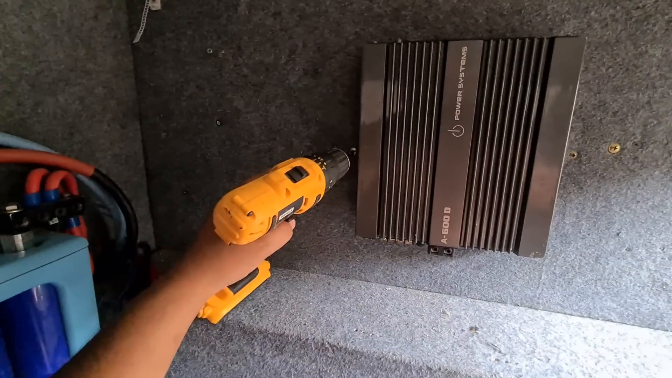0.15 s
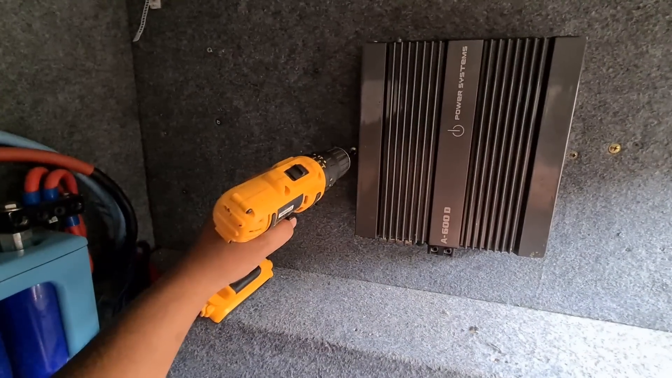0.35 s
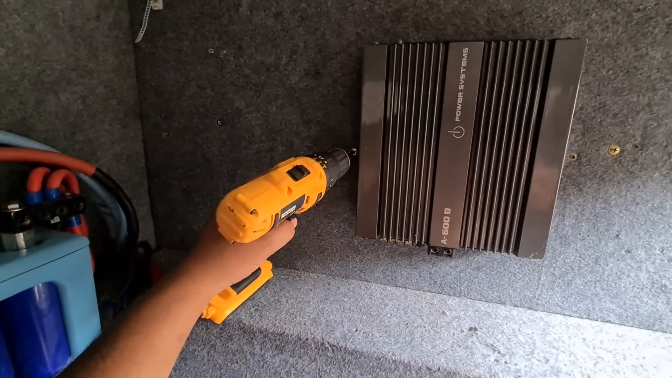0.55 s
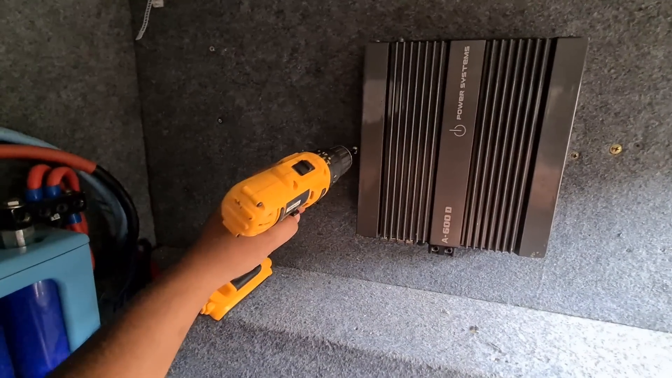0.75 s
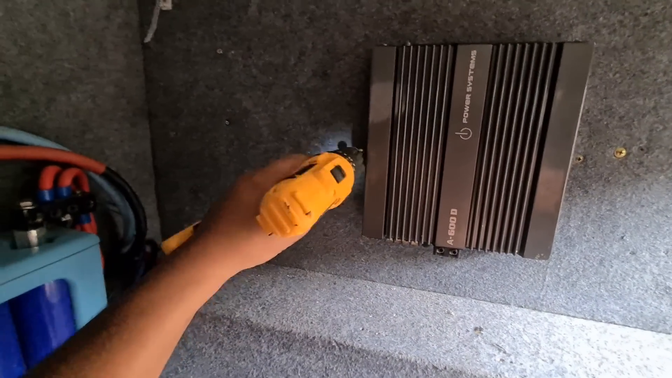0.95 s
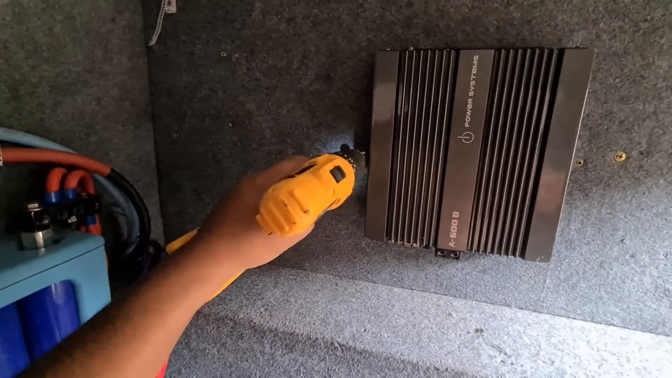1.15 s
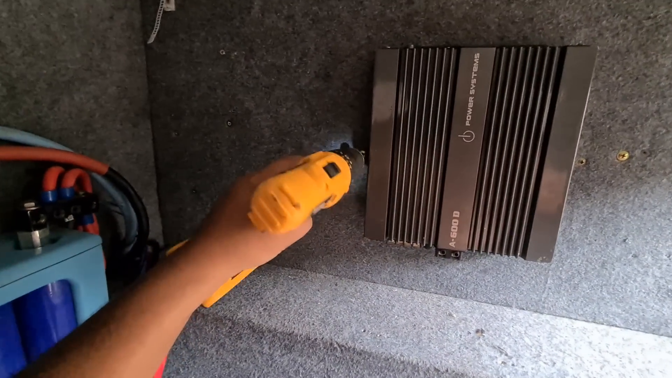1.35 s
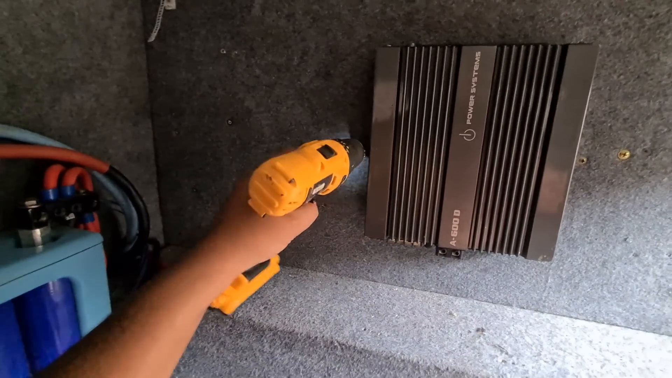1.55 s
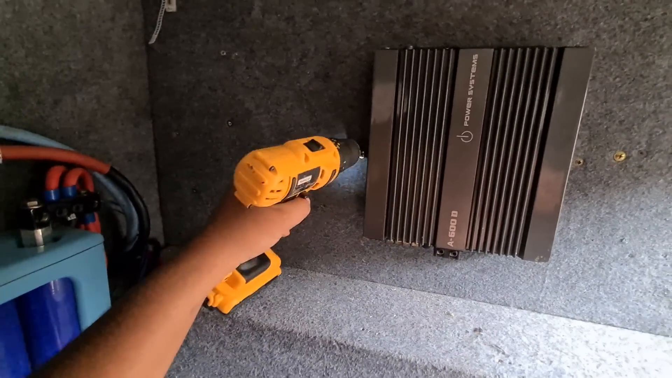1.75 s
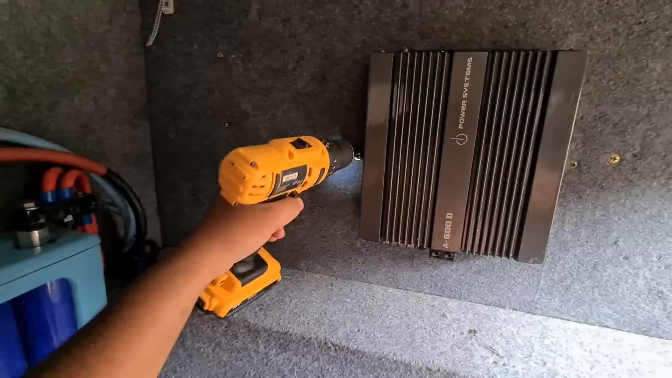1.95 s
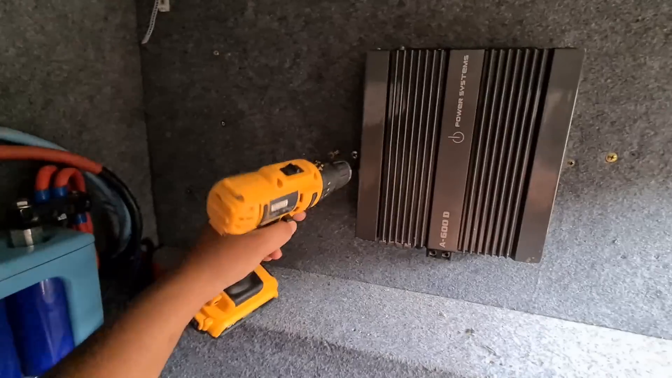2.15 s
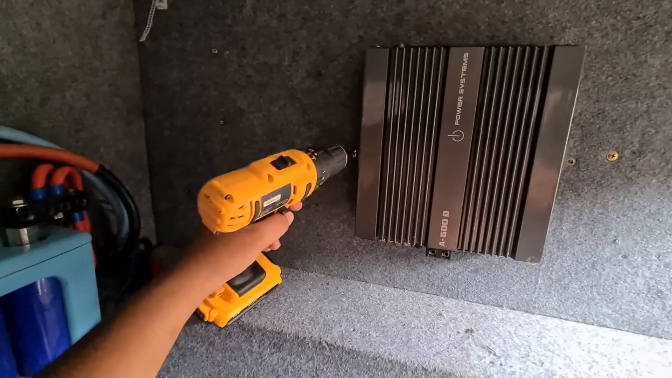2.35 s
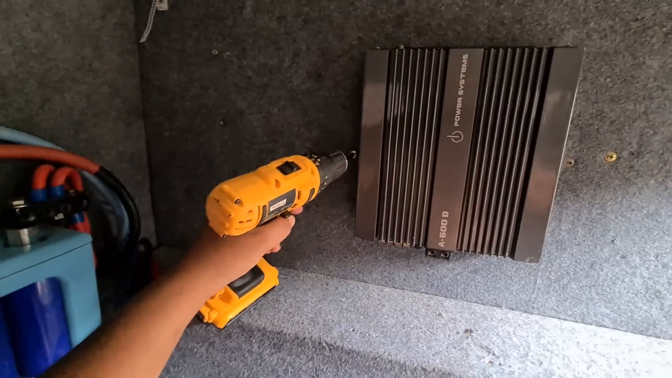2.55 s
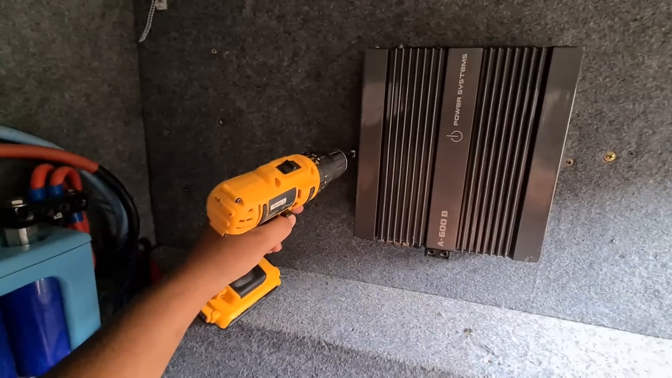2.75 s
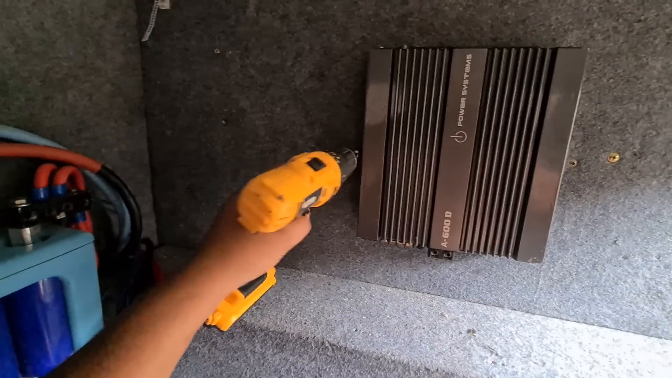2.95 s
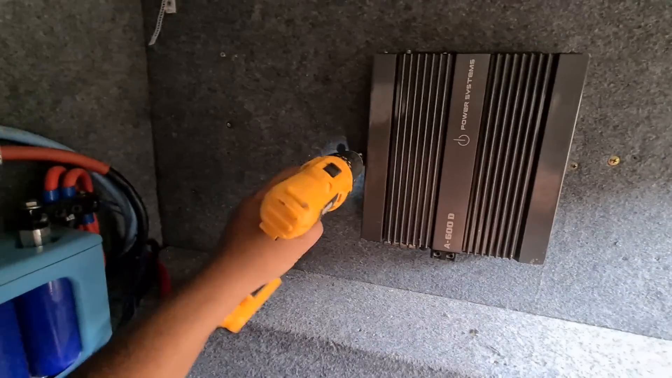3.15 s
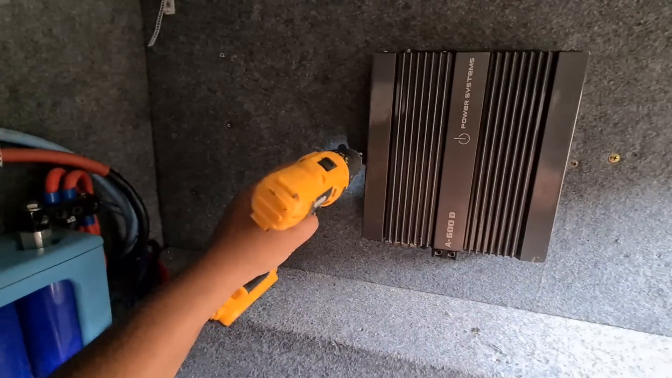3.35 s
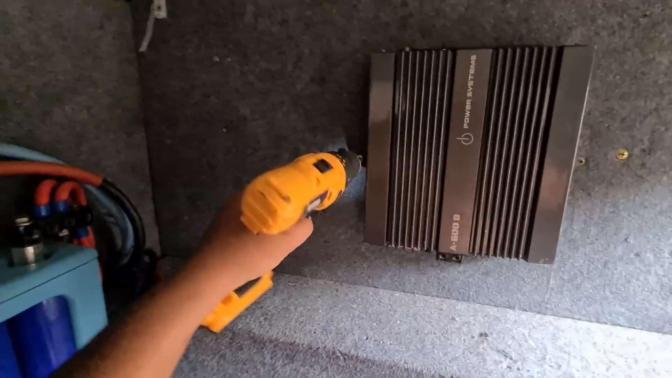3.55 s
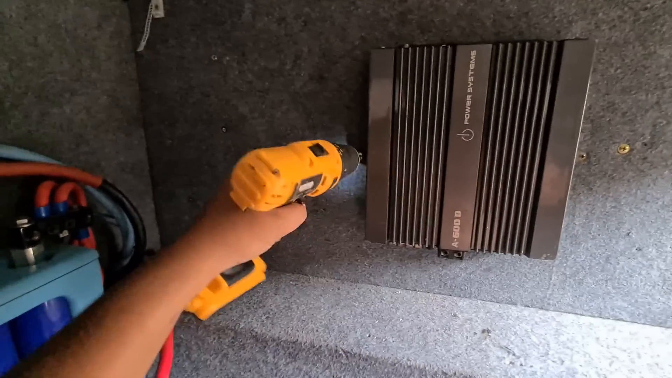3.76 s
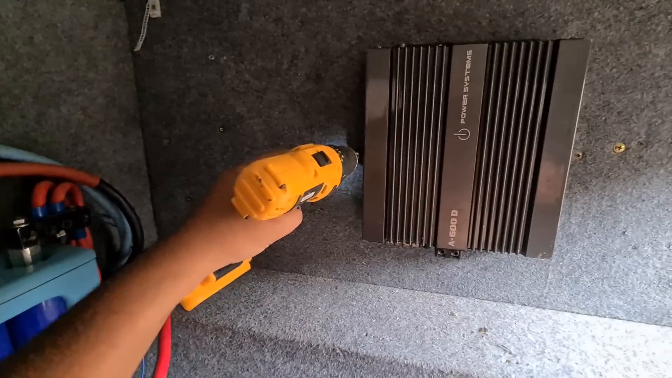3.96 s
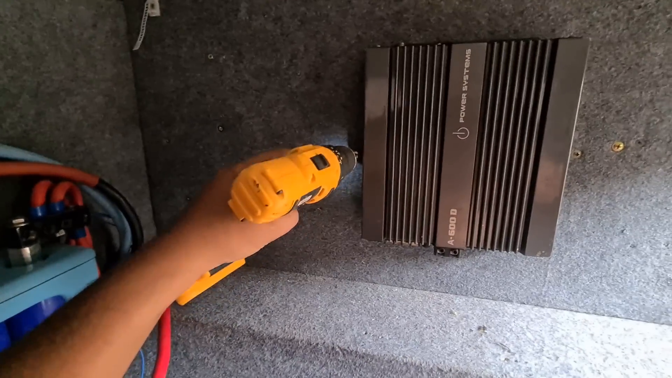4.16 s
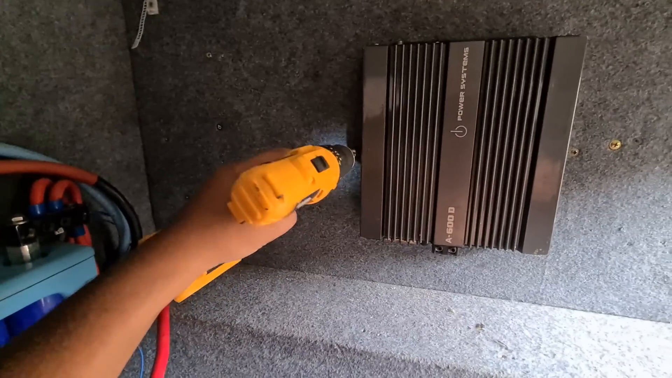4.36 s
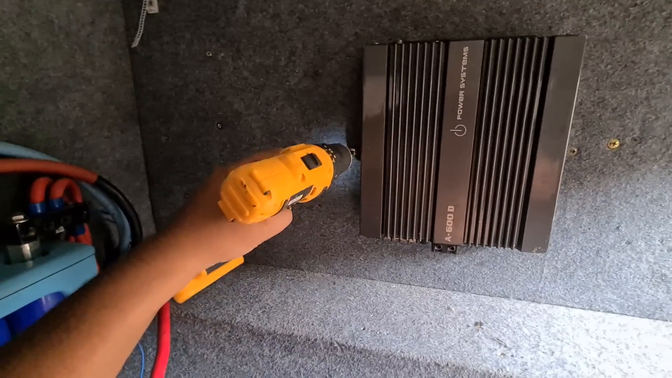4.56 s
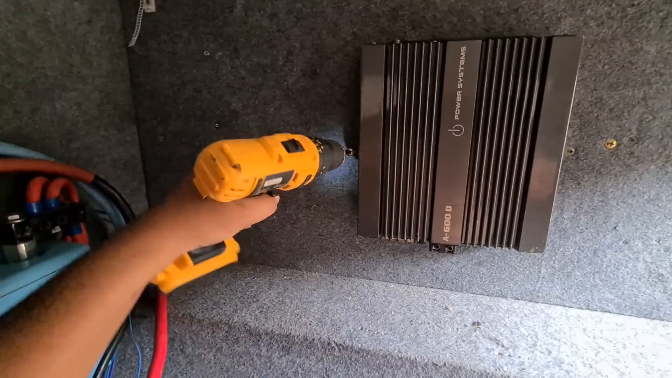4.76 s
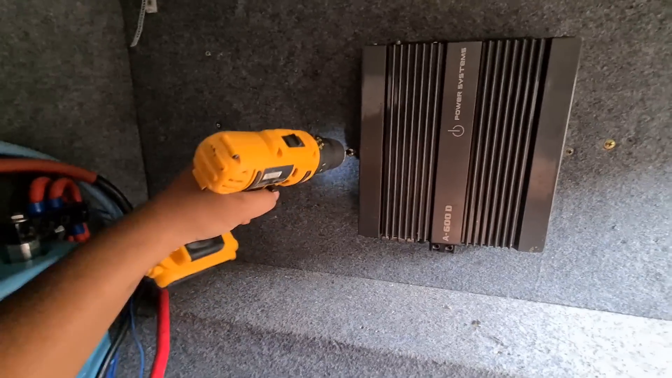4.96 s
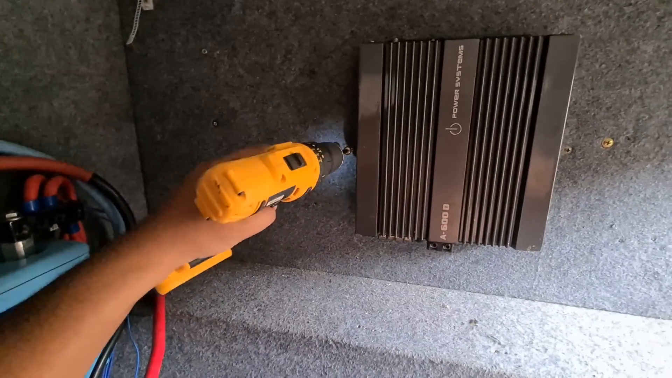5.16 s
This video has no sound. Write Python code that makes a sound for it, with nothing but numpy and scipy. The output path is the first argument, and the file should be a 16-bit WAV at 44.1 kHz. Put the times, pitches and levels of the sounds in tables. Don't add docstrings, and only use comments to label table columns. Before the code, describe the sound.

Two bursts of gritty electric drill whine, knocks and bit slips against a padded board in a car trunk, over faint distant rumble.

```python
import sys
import numpy as np
from scipy import signal
from scipy.fft import rfft, irfft
from scipy.io import wavfile
from scipy.ndimage import uniform_filter1d

SR = 44100
rng = np.random.default_rng(int(sys.argv[2]) if len(sys.argv) > 2 else 0)


def wrap_up_sound(samples):
    columns = np.atleast_2d(samples).T
    tamed = np.clip(columns, -1, 1)
    steps = np.round(tamed * 32767).astype(np.int16)
    wavfile.write(sys.argv[1], SR, steps)


def voltage_ratio(decibels):
    exponent = np.asarray(decibels, float) / 20
    return 10 ** exponent


N = 230307
TIME = np.arange(N) / SR
BINS = np.maximum(np.fft.rfftfreq(N, 1 / SR), 1)


def rms_one(x):
    return x / np.sqrt(np.mean(x ** 2) + 1e-20)


def at_hz(points, hz):
    table_hz, values = np.array(points).T
    return np.interp(np.log(hz), np.log(table_hz), values)


def played(rows, fade_s=.006):
    s, *columns = np.transpose(rows)
    gate = np.clip(np.minimum(TIME - s[0], s[-1] + fade_s - TIME) / fade_s, 0, 1)
    return [gate] + [np.interp(TIME, s, c) for c in columns]


def drift(rate):
    knots = rng.standard_normal(int(N / SR * 400) + 2)
    return np.interp(TIME * min(rate, 390), np.arange(len(knots)), knots)


def noise(spectrum):
    inside = (BINS > spectrum[0][0] * .7) & (BINS < spectrum[-1][0] * 1.1)
    white = rfft(rng.standard_normal((2, N)))
    return rms_one(irfft(white * voltage_ratio(at_hz(spectrum, BINS)) * inside, N))


def ring(clicks, modes):
    out = 0
    for hz, level_db, t60 in modes:
        r = voltage_ratio(-60 / (t60 * SR))
        w = 2 * np.pi * hz / SR
        strike = [0, voltage_ratio(level_db) * np.sin(w)]
        out = out + signal.lfilter(strike, [1, -2 * r * np.cos(w), r * r], clicks + 1e-18)
    return out


def clicks_at(seconds, sizes):
    return np.bincount(np.clip(np.round(seconds * SR).astype(int), 0, N - 1), sizes, N)


def soft(clicks, hz):
    return signal.sosfilt(signal.butter(2, hz, fs=SR, output="sos"), clicks)


def dying(clicks, t60):
    return signal.lfilter([1], [1, -voltage_ratio(-60 / (t60 * SR))], clicks + 1e-18)


# pitch in Hz, lead in seconds.
LEFT_LEAD = [(1500, .00015), (2500, .00036)]


def lines(rows, orders, per=1, wobble_db=3, colour=((1, 0), (2, 0)), flutter_hz=40):
    gate, hz, level_db = played(rows)
    on = gate > 0
    base_hz = hz[on] / per
    turns = np.cumsum(base_hz) / SR
    out = np.zeros((2, N))
    for k, order_db in orders:
        flutter_db = wobble_db * drift(flutter_hz)[on]
        level = level_db[on] + order_db + at_hz(colour, k * base_hz) + flutter_db
        apart = np.array([[0], [1]]) * (1 / 4 - k * base_hz * LEFT_LEAD[-1][1])
        phase = k * turns + rng.random() + apart + .13 * drift(70)[on]
        out[:, on] += np.sqrt(2) * gate[on] * voltage_ratio(level) * np.sin(2 * np.pi * phase)
    return out


# time in seconds, level in dB.
SWELL = [
    (0, 2),
    (2.2, 3),
    (2.6, 8),
    (5.22, 16.5),
]
# pitch in Hz, level in dB per Hz.
RUMBLE = [(12, -48), (20, 1), (38, -11), (54, -52), (65, -2), (85, -1.5), (103, -7), (124, -17), (206, -28),
          (387, -23.5), (800, -36), (1040, -85), (1760, -120)]
# pitch in Hz, level in dB per Hz.
AIR = [(410, -73), (700, -9), (777, -44), (875, -13.5), (1110, 4.5), (1250, -5.5), (1580, -12.5),
       (1710, -5), (2400, -10.5), (2960, -5), (3300, -12.5), (4200, -17), (5200, -21.5), (6300, -13),
       (7200, -21.5), (8900, -36), (11400, -28), (16000, -38)]


def outdoors():
    _, swell_db = played(SWELL)
    rumble = voltage_ratio(-44.5 + 0.22 * swell_db + 2.8 * drift(3.85)) * noise(RUMBLE)
    return rumble + voltage_ratio(-61.5 + swell_db + drift(15)) * noise(AIR)


# start in seconds, end in seconds, level in dB.
RUSTLE = [
    (2.678, 2.82, -59),
    (3.107, 3.15, -66),
]
# pitch in Hz, level in dB per Hz.
GEARS = [(940, -21.5), (1600, -49), (1890, -2.5), (2300, -6.5), (2920, 3), (3420, -2), (3630, 1),
         (4200, -6.5), (4650, 3), (5080, -1.5), (5670, 4.5), (7350, -7), (8200, -91), (10700, -55),
         (18000, -120)]


def grip_rustle():
    rise, fall = 153, 350
    strokes = 0
    for start, end, level_db in RUSTLE:
        outside_db = rise * np.maximum(start - TIME, 0) + fall * np.maximum(TIME - end, 0)
        strokes = strokes + voltage_ratio(level_db - outside_db)
    return strokes * voltage_ratio(1.4 * drift(35)) * noise(GEARS)


# time in seconds, peak in dB, pitch in Hz, ring in seconds,
# share of pure tone from 0 to 1.
TICKS = [(0.831, -48, 3560, 0.027, 0.9), (0.8462, -35.5, 3060, 0.034, 0.45),
         (0.8654, -24.5, 3120, 0.015, 0.5), (0.8947, -30, 3580, 0.03, 0), (0.835, -49, 1680, 0.11, 1),
         (1.005, -38, 3020, 0.03, 0.4), (2.0565, -10.5, 4555, 0.046, 0), (2.7824, -36, 1910, 0.32, 0.95),
         (2.8133, -45, 2900, 0.012, 0.7), (2.8249, -32.5, 3000, 0.013, 1), (3.016, -42, 3260, 0.056, 0.65),
         (3.0614, -53, 6700, 0.03, 0.15), (3.061, -36, 1140, 0.04, 0.4), (3.161, -31, 3170, 0.055, 0.6),
         (3.108, -43, 3220, 0.022, 0.8), (3.1274, -44, 3000, 0.013, 0.9), (3.172, -22.5, 4200, 0.035, 0.3),
         (3.186, -17.5, 3020, 0.071, 0.35)]
# the same five columns, in seconds, dB, Hz, seconds and share.
FINE_TICKS = [
    (2.638, -52, 13000, .01, 0),
    (2.664, -51, 9500, .012, 0),
    (2.681, -56, 8000, .01, 0),
    (2.735, -54, 14000, .01, 0),
    (2.748, -56, 11500, .01, 0),
]


def ticks():
    rows = TICKS + FINE_TICKS
    out = np.zeros((2, N))
    after = np.arange(SR // 10) / SR
    puffs = rng.standard_normal((len(rows), 2, len(after)))
    for (s, peak_db, hz, ring_s, tone), puff in zip(rows, puffs):
        band = signal.butter(2, [hz * .55, min(hz * 1.7, .45 * SR)], "band", fs=SR, output="sos")
        sound = tone * np.sin(2 * np.pi * hz * after) + signal.sosfilt(band, puff)
        fade_db = 60 * after / max(ring_s, .003)
        out[:, round(s * SR):][:, :len(after)] += voltage_ratio(peak_db + 4.0 - fade_db) * sound
    return out


# time in seconds, peak in dB.
THUDS = [(1.413, -4.5), (1.455, -6), (1.524, -12), (1.571, -18), (1.66, -42), (1.957, -17.5), (3.09, -35),
         (3.162, -24), (3.298, -9), (3.33, -20), (3.533, -7), (5.205, -2.5)]
# thud time in seconds, thud in dB,
# surplus speed in teeth per second (Hz), whine afterwards in dB.
SLIPS = [
    (1.214, 1, 150.7, 1.5),
    (1.355, 0, 100, -5),
    (3.747, -2, 260.7, -0.5),
    (4.216, 0, 330.5, 0),
    (4.532, -0.5, 172.6, 0),
    (4.706, -1.5, 193.3, -1),
    (4.842, -0.5, 176.8, 3),
    (4.934, -3.5, 175, 1),
    (5.055, -2, 169, -1.5),
]
# pitch in Hz, level in dB, time to die by 60 dB in seconds.
BOARD = [(77.3, -11, 0.43), (99.3, -2.5, 0.31), (144.6, -1, 0.1), (185.5, 4, 0.11), (296.4, -5, 0.095)]


def thuds():
    s, peak_db = np.transpose(THUDS + [slip[:2] for slip in SLIPS])
    return ring(soft(clicks_at(s + 0.0012, voltage_ratio(peak_db - 6.0)), 132), BOARD)


# pitch in Hz, level in dB, time to die by 60 dB in seconds.
PANEL = [(307.8, -5, 0.024), (411, -12, 0.023), (469.5, -4.5, 0.06), (516, 3.5, 0.043),
         (657.5, -11.5, 0.054), (882.5, -10.5, 0.041)]
# pitch in Hz, level in dB, time to die by 60 dB in seconds.
CHUCK = [(1195, 1, 0.048), (1325, 6, 0.024), (1390, -13, 0.039), (2010, -2.5, 0.054)]
# delay in seconds, strength on the panel and
CONTACTS = [
    (-.003, 0.26, 0.093),
    (0, -0.4, 0.34),
    (.0012, 0.6, 0.81),
    (.0030, 0.7, 0.46),
    (.0052, .5, -.3),
    (.009, -0.45, 0.25),
    (.015, .25, 0.15),
]


def rattle(s, panel_db, chuck_db):
    modes = PANEL + CHUCK
    chance = rng.standard_normal((len(s), 2 * len(CONTACTS)))
    weights = voltage_ratio(2 * rng.standard_normal((len(s), len(modes))))
    sizes, moments = [], []
    for k, (late_s, *strengths) in enumerate(CONTACTS):
        sizes.append(np.outer(strengths, voltage_ratio(1.5 * chance[:, k])))
        moments.append(s + late_s * (1 + .1 * chance[:, -1 - k]))
    out = 0
    for k, mode in enumerate(modes):
        on_chuck = int(k >= len(PANEL))
        body_db = chuck_db - 9.0 if on_chuck else panel_db - 11.5
        hits = np.array(sizes)[:, on_chuck] * voltage_ratio(body_db) * weights[:, k]
        out = out + ring(clicks_at(np.ravel(moments), np.ravel(hits)), [mode])
    return out


# time in seconds, then panel, boom, edge and chuck levels in dB.
KNOCKS = [(0.261, -14.5, -25, -76, -57), (0.532, -28, -29, -62, -34.5), (0.541, -20, -65, -58, -30),
          (0.552, -20, -23.5, -41, -22.5), (0.557, -21.5, -27.5, -49, -26), (0.567, -51, -34, -66, -34),
          (0.576, -52, -26.5, -82, -55), (0.68, -20.5, -15.5, -49.5, -39), (0.776, -17.5, -16, -49, -42),
          (0.911, -12.5, -20, -22.5, -23), (0.916, -21, -23, -32.5, -16.5), (1.071, -18.5, -48, -29.5, -17),
          (1.266, -19, -23, -35, -28), (1.283, -17, -29, -41, -38), (1.345, -27, -30, -42, -22),
          (1.399, -20, -17, -35, -31), (1.419, -16, -25, -50, -31), (1.432, -11, -3.5, -19.5, -6.5),
          (1.443, -15, -13.5, -50, -18.5), (1.479, -18, -9, -30, -13), (1.495, -12.5, -15, -21.5, -17),
          (2.059, -30, -74, -22, -19.5), (2.562, -16.5, -40, -51, -30.5), (2.707, -34.5, -33, -80, -63),
          (2.974, -35, -30, -61, -50), (3.038, -56, -37, -50, -49), (3.162, -19, -25, -50, -42),
          (3.186, -19, -18, -27, -25), (3.276, -4, -8.5, -17, -10.5), (3.325, -6, -10, -16, -7),
          (3.358, -2.5, -11.5, -16.5, -6.5), (3.39, 0.5, -14.5, -17, -5), (3.493, -25, -7, -17, -7.5),
          (3.561, -14, -11.5, -16.5, -7)]
# time in seconds, then panel, boom, edge and
# chuck levels in dB.
CLACKS = [
    (1.25, 1, -13, -20, -3),
    (1.387, 1, -21, -19, -10.5),
    (3.781, -10, -11, -16.5, -6),
    (4.25, -4.5, -17, -17, -7.5),
    (4.563, -6, -20, -17, -5),
    (4.736, -4, -24, -17, -12),
    (4.872, -3, -18, -19, -13.5),
    (4.964, -3.5, -16.5, -18, -14),
    (5.084, -3.5, -22.5, -18.5, -10),
]
# pitch in Hz, level in dB per Hz.
SCUFF = [(90, 0.5), (150, 25), (330, -2), (560, 9.5), (800, 0.5), (1300, -8.5), (2100, -7), (3250, -47)]
# pitch in Hz, level in dB per Hz.
CRACK = [(880, 2), (1500, -6), (1820, 5), (3000, -0.5), (5990, -2), (7320, -4), (8090, -17), (12700, -16.5),
         (15400, -28), (16800, -44)]
# pitch in Hz, level in dB per Hz.
TOP = [(4410, -15), (7300, -2), (7800, -7.5), (8400, -10), (9300, -8.5), (10900, -10.5), (14100, -13),
       (15100, -12), (15800, -13.5), (16300, -54)]


def blows():
    s, panel_db, boom_db, edge_db, chuck_db = np.transpose(KNOCKS + CLACKS)
    boom = ring(soft(clicks_at(s + 0.0022, voltage_ratio(boom_db - 1.0)), 300), BOARD)
    body = thuds() + boom + rattle(s, panel_db, chuck_db)
    body = signal.sosfilt(signal.butter(4, 70, "high", fs=SR, output="sos"), body)
    scuff = dying(soft(clicks_at(s, voltage_ratio(panel_db - 16.5)), 110), 0.14) * noise(SCUFF)
    edges = clicks_at(s, voltage_ratio(edge_db)) + clicks_at(s + 0.0019, voltage_ratio(edge_db - 5.0))
    edges = edges + clicks_at(s - 0.0032, voltage_ratio(edge_db - 11.5))
    crack = dying(soft(edges, 300), 0.039) * noise(CRACK)
    snap_clicks = clicks_at(s + .001, voltage_ratio(3.6 * (edge_db + 18) - 16))
    snap = dying(soft(snap_clicks, 500), .011) * noise(TOP)
    return body + scuff + crack + snap


# time in seconds, motor drive in dB, load on the board in dB.
BURSTS = [
    [(.82, -79, -76), (.9, -30, -28), (.97, -41, -34), (1.04, -31, -29.5), (1.19, -23.5, -24.5),
     (1.29, -26.5, -38), (1.41, -28, -11), (1.52, -28.5, -26.5), (1.6, -29, -36), (1.95, -28.5, -38.5),
     (2.064, -27.5, -44.5)],
    [(3.14, -45.5, -30), (3.22, -28, -22), (3.34, -27.5, -17.5), (3.45, -32, -29), (3.96, -34, -30.5),
     (4.19, -31.5, -31.5), (4.41, -32.5, -30), (4.62, -32, -27.5), (5.22, -33.5, -32.5)],
]
# time since then in seconds, loss in dB.
COAST = [
    (0.03, 2.5),
    (.09, 18),
    (.14, 40),
]


def bursts():
    out = []
    for rows in BURSTS:
        end_s, drive_db, load_db = rows[-1]
        out.append(rows + [(end_s + s, drive_db - loss_db, load_db - loss_db / 2) for s, loss_db in COAST])
    return out


def free_run():
    top_hz, short_hz, spin_up_s = 3690, 500, .11
    brake_s, brake_hz_per_s = 2.0, 3800
    s = np.linspace(1.505, 2.055, 60)
    braked_hz = brake_hz_per_s * np.maximum(s - brake_s, 0)
    hz = top_hz - short_hz * np.exp((s[0] - s) / spin_up_s) - braked_hz
    level_db = -38 + 160 * np.clip(s - brake_s, 0, .035)
    return np.transpose([s, hz, level_db])


# time in seconds, teeth per second (Hz).
PACE = [(.9, 60), (1.08, 356), (1.115, 360), (1.158, 412), (1.215, 541), (1.29, 590), (1.34, 601),
        (1.37, 575), (3.3, 520), (3.69, 480), (3.75, 520), (3.94, 535), (4.05, 495), (4.21, 550),
        (4.36, 575), (4.45, 665), (4.54, 672), (4.62, 745), (4.71, 775), (4.82, 810), (4.93, 868),
        (5.22, 872)]


def teeth_rate():
    bite_s, sag_s, let_go_s = .014, .024, .005
    thud_s, _, surplus_hz, bite_db = np.transpose(SLIPS)[:, :, None]
    clack_s = np.transpose(CLACKS)[0]
    after = TIME - clack_s[:, None] - bite_s
    racing = np.sum(surplus_hz * (after > 0) * np.exp(-np.abs(after) / sag_s), axis=0)
    slipping = np.any((TIME > thud_s + let_go_s) & (after < 0), axis=0)
    firm_db = np.append(0, bite_db)[np.searchsorted(clack_s, TIME)]
    return np.interp(TIME, *np.transpose(PACE)) + racing, slipping, firm_db


TEETH = 12
# pitch in Hz, level in dB per Hz.
GRIND = [(1900, -32), (2140, 2), (2500, -23), (2940, 1.5), (3100, -3.5), (3270, 0), (3430, -8), (3590, -6),
         (4100, -18), (4530, -15), (4650, -25), (4770, 1), (5100, -28), (5450, -20), (6500, -20)]
# pitch in Hz, level in dB per Hz.
SQUEAL = [(1100, -22), (1290, 3), (1480, -22), (4800, -22), (5400, -5), (5850, 0), (6400, -3), (7000, -20)]
# pitch in Hz, level in dB per Hz.
HUM = [(410, -61), (700, -33), (880, -2), (941, -20.5), (1110, 4), (1300, 0.5), (1590, -4), (1800, -7.5),
       (2340, -2.5), (3960, -120)]
# pitch in Hz, level in dB per Hz.
SHAKE = [(15, -58), (25, -20), (38, -37), (54, -18), (91, 5), (177, 0.5), (205, 0), (321, -5.5), (355, -20),
         (376, -5), (503, -2), (565, -10.5), (800, -25), (1040, -21), (1760, -120)]
# pitch in Hz, level in dB per Hz.
FLOOR_PAN = [(60, -25), (80, -13), (103, -10), (140, -31), (195, -5), (240, -18)]


def motor():
    free, teeth_hz, _ = played(free_run(), fade_s=0.072)
    throb = 1 + 0.058 * free * np.sin(2 * np.pi * np.cumsum(teeth_hz) / TEETH / SR)
    rough = throb * voltage_ratio(.7 * drift(30) + 1.7 * drift(300))
    [slow] = played([[0.88], [1.23]], fade_s=.04)
    grind = voltage_ratio(-0.5 + 1.9 * drift(45.3)) * slow * noise(GRIND)
    squeal = voltage_ratio(-4.5) * free * noise(SQUEAL)
    gears = rough * (voltage_ratio(-5.5 * slow) * noise(GEARS) + grind + squeal)
    top = rough * noise(TOP)
    hum = voltage_ratio(1.8 * drift(40) + 0.5 * free) * noise(HUM)
    shake = voltage_ratio(3 * drift(15)) * noise(SHAKE)
    [loose] = played([[1.376], [2.04]], fade_s=0.06)
    full_hz = 996
    speed_hz = np.minimum(teeth_rate()[0] + full_hz * loose, full_hz)
    bright_db = -13 + 10.5 * np.log2(speed_hz / 500)
    out = voltage_ratio(-46 + 3.9 * drift(8.6)) * free * noise(FLOOR_PAN)
    for rows in bursts():
        gate, drive_db, load_db = played(rows, fade_s=.015)
        hiss = voltage_ratio(drive_db - 2.0) * gears + voltage_ratio(drive_db + bright_db) * top
        hum_db = -39.5 + 1.24 * (drive_db + 31)
        out = out + gate * (hiss + voltage_ratio(hum_db) * hum + voltage_ratio(load_db - 3.5) * shake)
    return out


# time in seconds, pitch in Hz, level in dB.
CHOPPER = [
    [(.852, 3300, -56), (.875, 3120, -53), (.91, 2980, -49), (.95, 2935, -49), (1.06, 2925, -49)],
    [(3.062, 3210, -49), (3.125, 3200, -49), (3.135, 3050, -49), (3.165, 2980, -47)],
]
# multiple of the pitch (a plain number), level in dB.
CHOPPER_ORDERS = [
    [(1, -5), (2, -1), (3, -18), (4, -23), (5, -23)],
    [(1, -4), (2, -1), (3, -9), (4, -19)],
]
# time in seconds, pitch in Hz, level in dB.
SQUEAK = [
    (.008, 2830, -76),
    (.017, 2780, -30.5),
    (.027, 3010, -53),
    (.036, 3024, -84),
]
# time in seconds, pitch in Hz, level in dB.
CREAK = [
    (2.7, 2400, -62),
    (2.74, 2520, -55),
    (2.79, 2670, -59),
    (2.81, 2600, -66),
]


def trigger_tones():
    out = lines(SQUEAK, [(0.98, 0)], wobble_db=-4) + lines(CREAK, [(1, 0)])
    for rows, orders in zip(CHOPPER, CHOPPER_ORDERS):
        out = out + lines(rows, orders, wobble_db=2)
    return out


# multiple of the rotor's turns (a plain number), level in dB.
FREE_ORDERS = [(1, -5), (4.2, -7), (8, -11), (9.5, -11), (12, 2), (15.6, -9), (17.5, -7), (18.5, -2),
               (19.3, -1), (21, 1), (22.8, -5), (24, 2)]
# pitch in Hz, level in dB.
FREE_COLOUR = [(3340, 2), (3500, -2), (3645, -4), (3672, 0), (3690, 3), (3900, 0), (7260, 0), (7350, -14)]


def free_whine():
    return lines(free_run(), FREE_ORDERS, per=TEETH, wobble_db=2.2, colour=FREE_COLOUR)


# start in seconds, end in seconds.
BITING = [
    (1.08, 1.36),
    (3.6, 5.21),
]
# pitch in Hz, level in dB.
HOUSING = [
    [(400, -14), (520, 0), (750, -14), (1120, 0), (1500, -14), (2140, -7), (2550, -14), (2950, 2),
     (3100, -4), (3290, 4), (3450, -4), (3650, 1), (4000, -10), (4530, 7), (4700, -3), (4850, 2),
     (5100, -3), (5300, -3), (5550, 0), (6200, -10), (9000, -30)],
    [(400, -14), (520, 6), (750, -14), (1120, 4), (1500, -14), (2650, -10), (3000, 1), (3300, 1),
     (3750, -5), (4000, -3), (4400, 2), (4800, 1), (5050, -3), (5350, 4), (6000, -8), (7200, -14),
     (9000, -30)],
]
# time in seconds, teeth per second (Hz), whine in dB.
SURGE = [
    (1.395, 1500, -50),
    (1.41, 1530, -36),
    (1.418, 1545, -35),
]


def whine():
    hz, slipping, firm_db = teeth_rate()
    stack = [(k, 0) for k in range(1, 17)] + [(k + .5, -8) for k in range(4, 10)]
    surplus_hz = hz - np.interp(TIME, *np.transpose(PACE))
    mute_db = 60 * uniform_filter1d(1. * slipping, size=200) + .02 * surplus_hz
    out = lines(SURGE, [(2, 11.0), (3, 8.5), (4, 4), (5, 4.0)])
    for rows, (start, end), colour in zip(bursts(), BITING, HOUSING):
        _, drive_db, _ = played(rows)
        level_db = -48 + 1.0 * (drive_db + 35) + 7.5 * np.log2(hz / 500) + firm_db - mute_db
        uneven_hz = hz * (1 + .012 * drift(60))
        biting = (TIME > start) & (TIME < end)
        stretch = np.transpose([TIME, uneven_hz, level_db])[biting]
        out = out + lines(stretch, stack, wobble_db=4, colour=colour, flutter_hz=75)
    return out


# pitch in Hz, left minus right in dB.
TILT = [(60, -4), (110, -1.5), (200, -1), (380, 0), (700, -2.5), (1290, -2), (2380, -4), (4400, -11.5),
        (8120, -4), (15000, -7.5)]
# pitch in Hz, shared share from 0 to 1.
LIKENESS = [(25, 0.8), (60, 1), (300, 0.83), (700, 1), (1500, 0.17), (4000, 0.15), (12000, 0.1)]


def ports(x, other):
    alike = np.clip(at_hz(LIKENESS, BINS), 0, 1)
    half = voltage_ratio(at_hz(TILT, BINS) / 2)
    right = rfft(x)
    early = np.exp(2j * np.pi * BINS * at_hz(LEFT_LEAD, BINS))
    left = (alike * right + np.sqrt(1 - alike ** 2) * rfft(other)) * early
    return irfft([left * half, right / half], N)


def scene():
    tool = motor() + trigger_tones() + free_whine() + whine()
    return ports(*(outdoors() + grip_rustle() + ticks() + blows() + tool))


def band_limit(x):
    return signal.sosfilt(signal.butter(12, 16830, fs=SR, output="sos"), x)


def record(dry):
    mix = 1.022 * np.tanh(dry / 1.261)
    return band_limit(mix)


dry = scene()
out = record(dry)
wrap_up_sound(out)
```